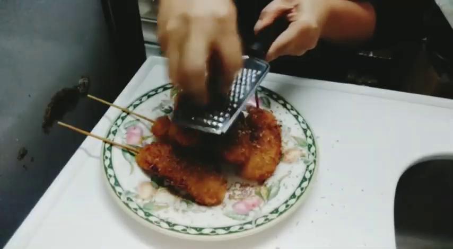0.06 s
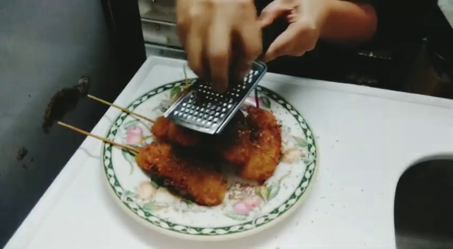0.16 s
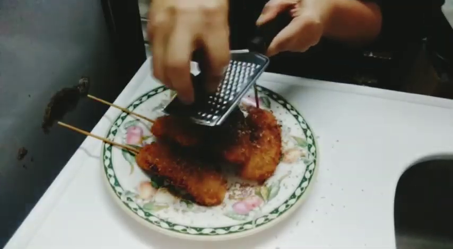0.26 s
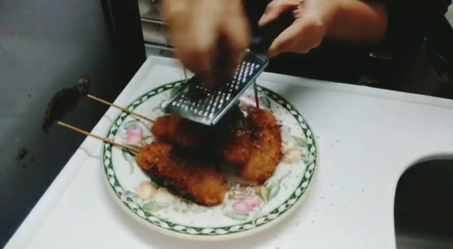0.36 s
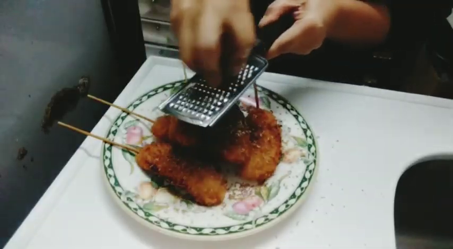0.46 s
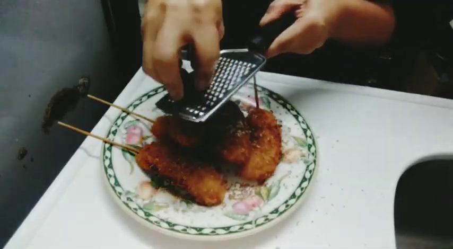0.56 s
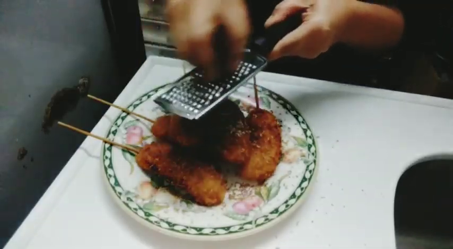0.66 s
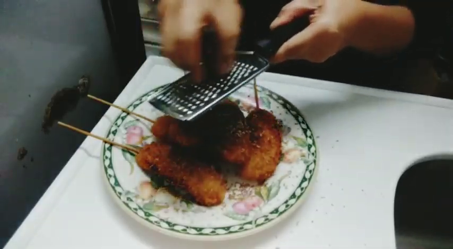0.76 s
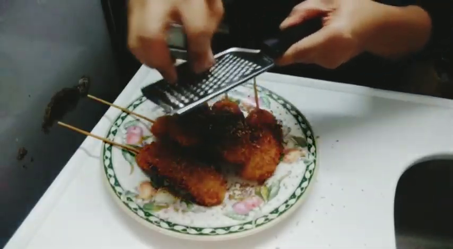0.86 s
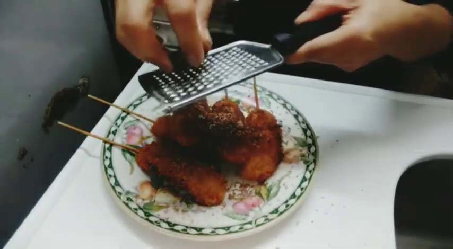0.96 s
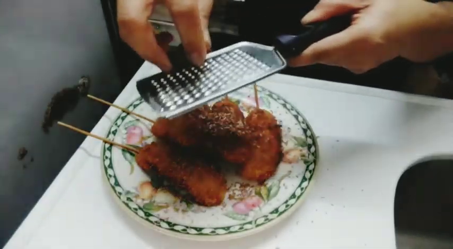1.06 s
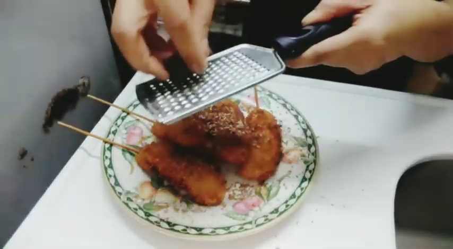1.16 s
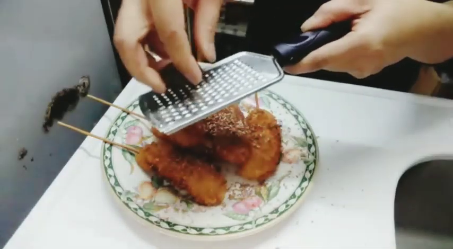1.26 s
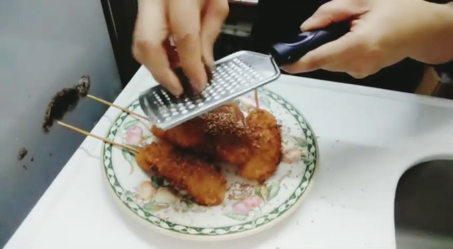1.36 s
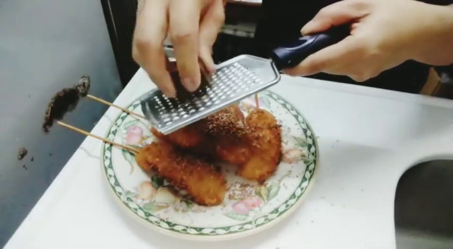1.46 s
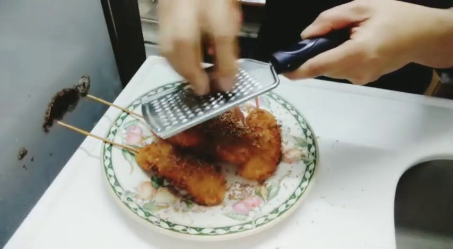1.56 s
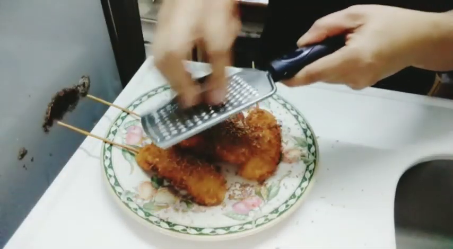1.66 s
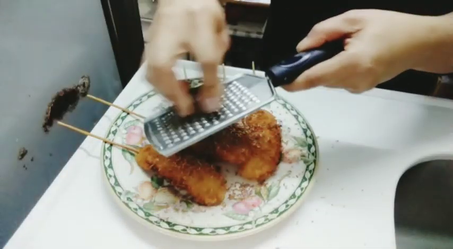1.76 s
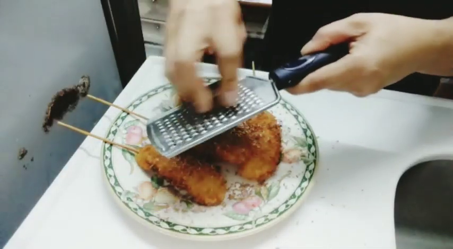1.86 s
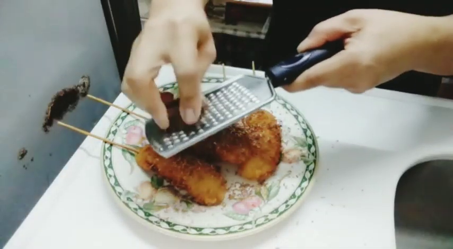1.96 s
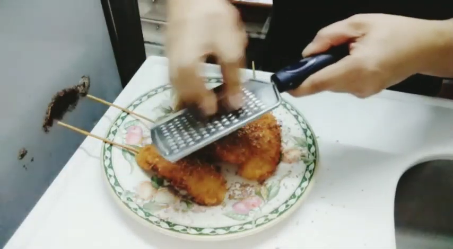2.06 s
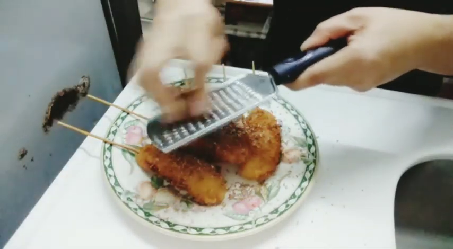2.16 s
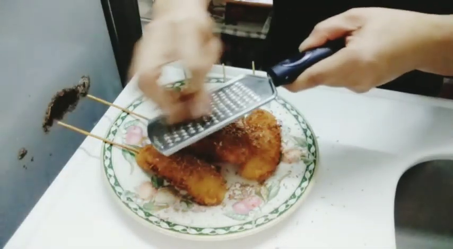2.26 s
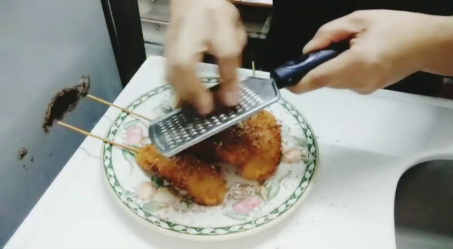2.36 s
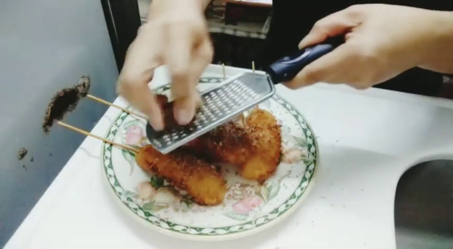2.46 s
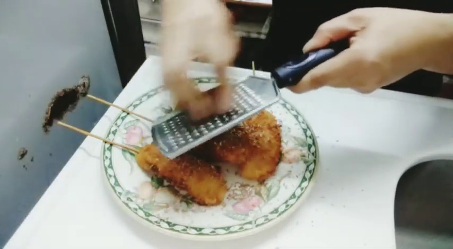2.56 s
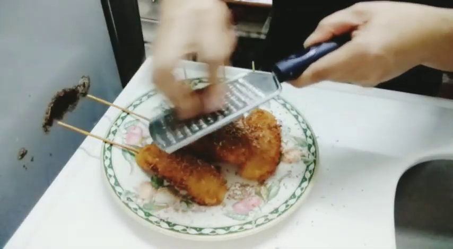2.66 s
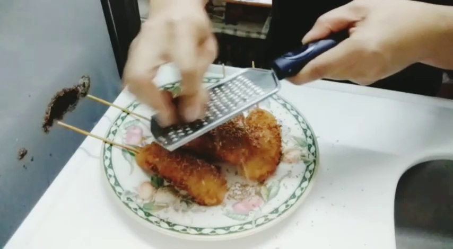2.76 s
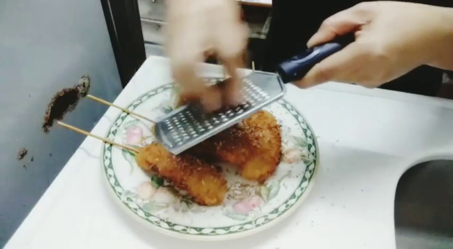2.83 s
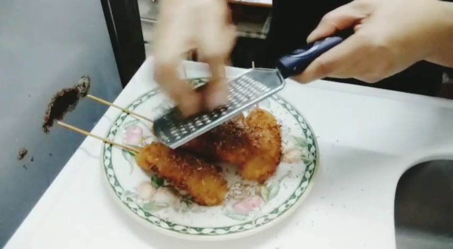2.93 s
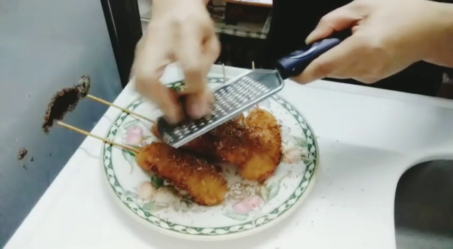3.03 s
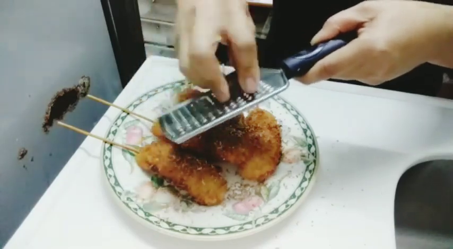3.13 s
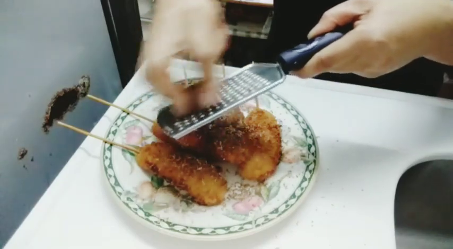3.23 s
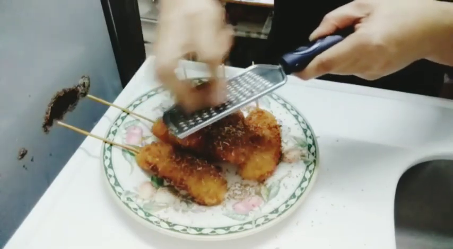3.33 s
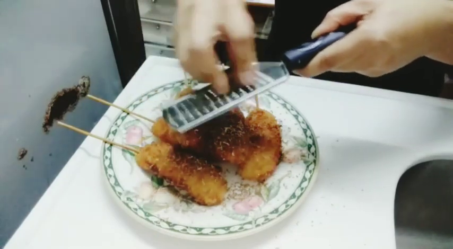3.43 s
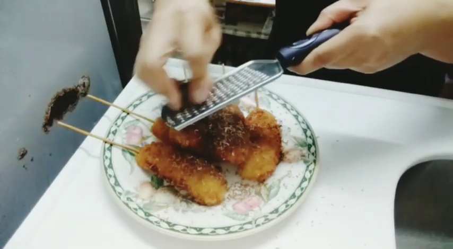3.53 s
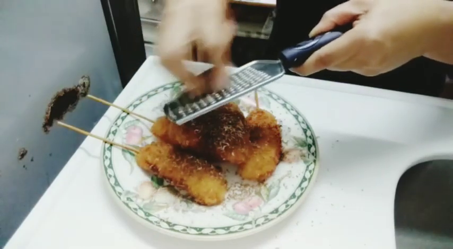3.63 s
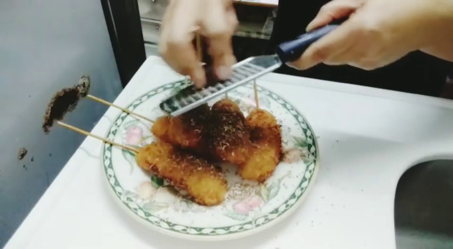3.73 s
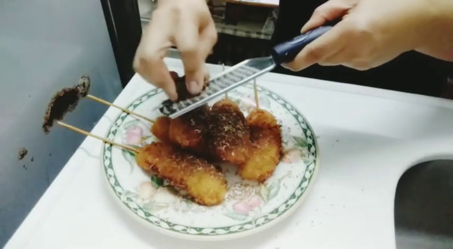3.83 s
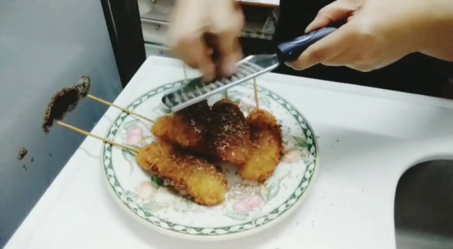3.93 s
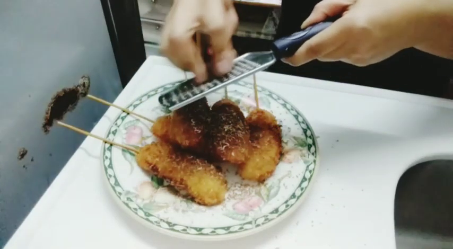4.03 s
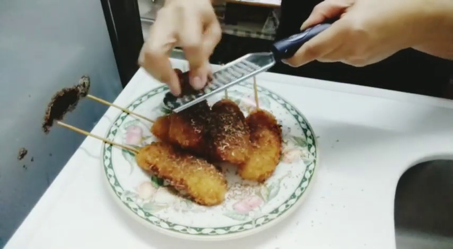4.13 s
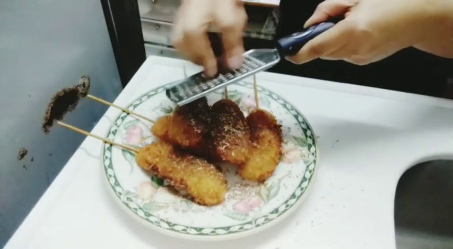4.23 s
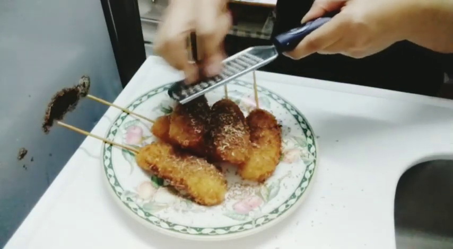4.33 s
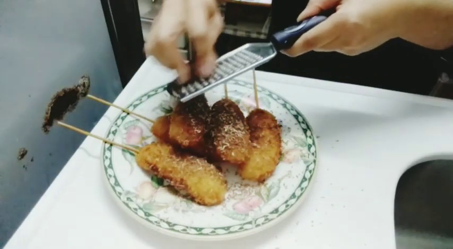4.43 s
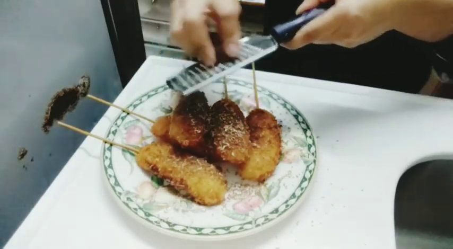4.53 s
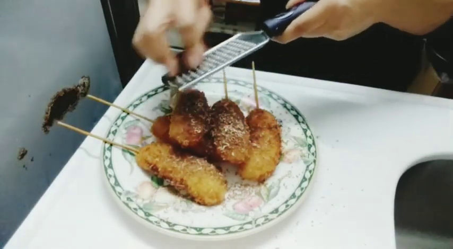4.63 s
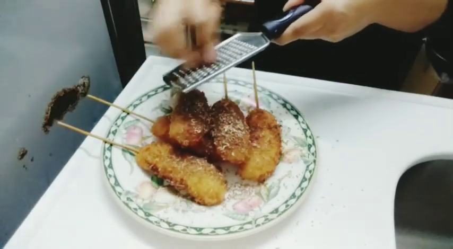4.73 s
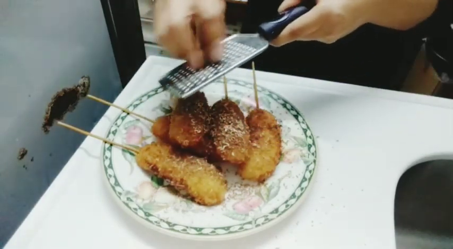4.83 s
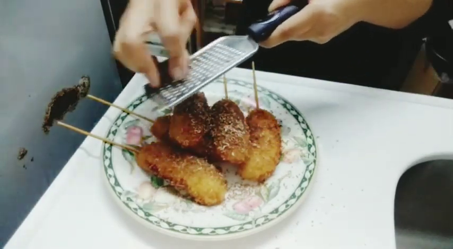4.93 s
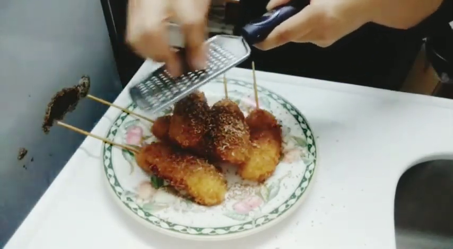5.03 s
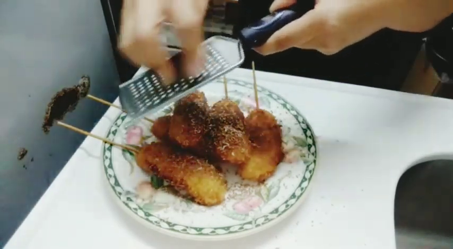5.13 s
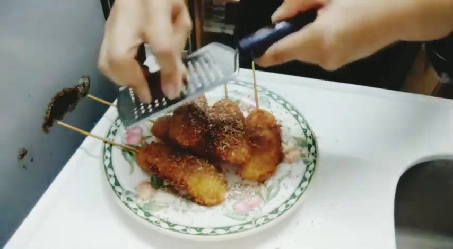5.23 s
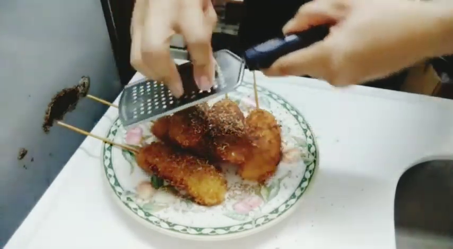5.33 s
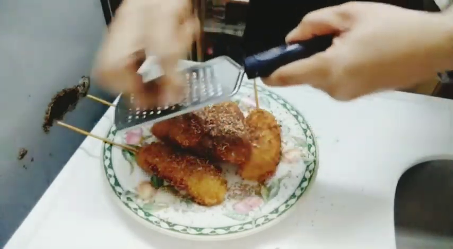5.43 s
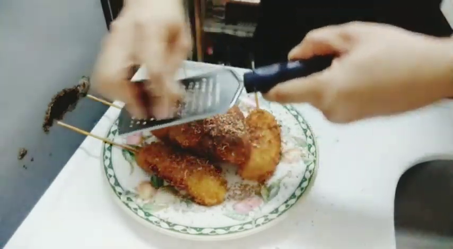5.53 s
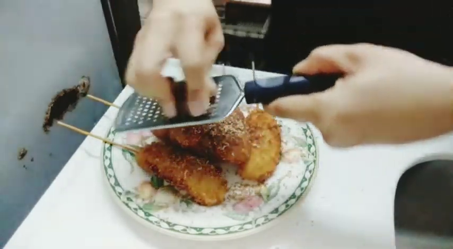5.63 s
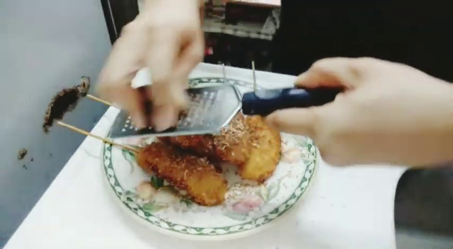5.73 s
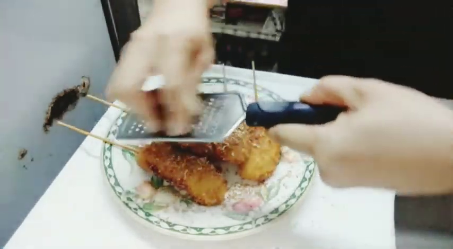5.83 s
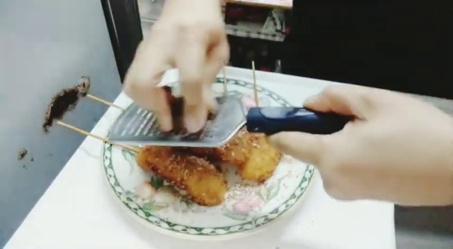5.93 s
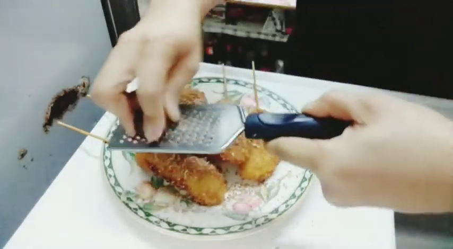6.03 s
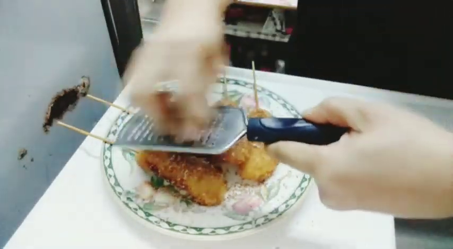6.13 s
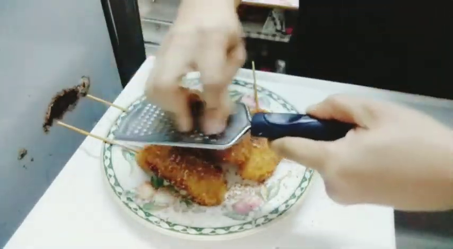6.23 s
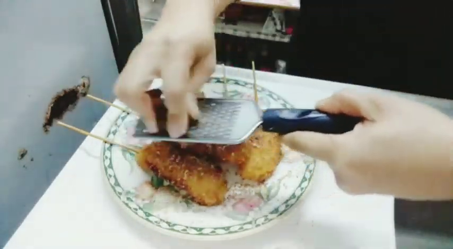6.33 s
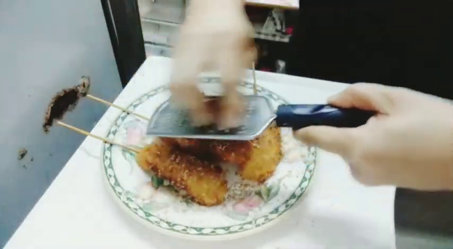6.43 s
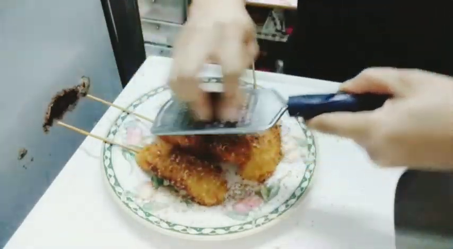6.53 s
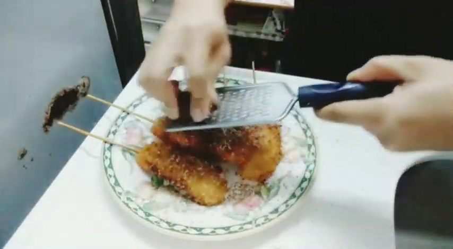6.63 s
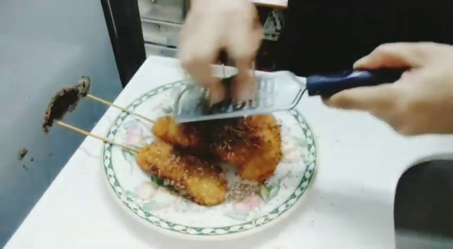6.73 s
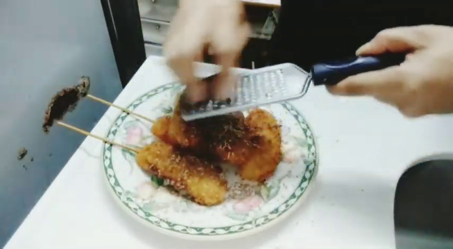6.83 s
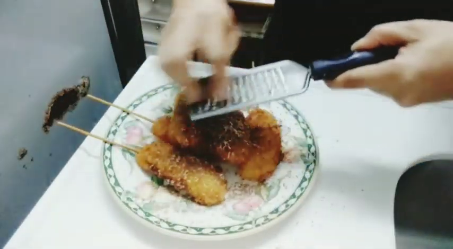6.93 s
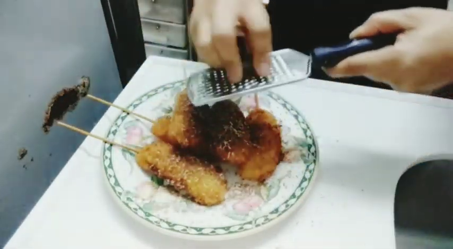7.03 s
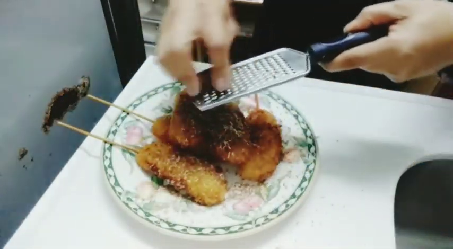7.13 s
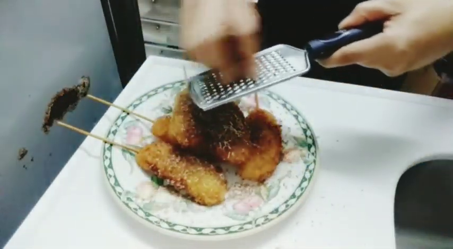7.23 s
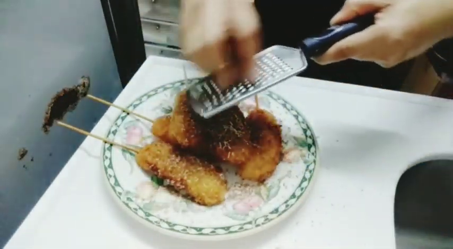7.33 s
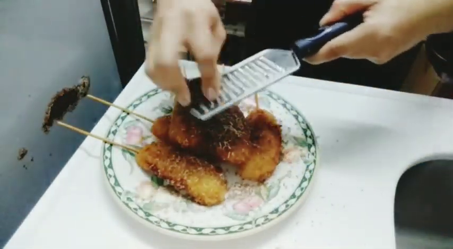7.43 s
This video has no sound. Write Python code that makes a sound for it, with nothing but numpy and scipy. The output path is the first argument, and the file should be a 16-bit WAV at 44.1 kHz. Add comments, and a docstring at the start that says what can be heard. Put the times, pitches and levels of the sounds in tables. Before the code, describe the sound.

In a small kitchen with short hard reflections, heard close up through a phone microphone, a hard bar is rubbed on a thin steel grater over a low droning rumble. From 0 to about 0.8 s, quick strokes rasp and hiss, with a high metallic ring. A pause follows: faint narrow squeaks near 1.0 s, a sharp tap at 1.2 s that lets the sheet ring freely, another tiny squeak near 1.5 s. Rubbing resumes at about 1.55 s, soft at first, then regular, about seven strokes per second, pushes mostly louder than returns. Dull low thuds come at 1.2, 1.6, 2.0 (strongest) and 2.7 s. Teeth snag with little cracks, notably around 2.1 to 2.6 and 3.4 to 3.5 s. Strokes are brightest and strongest from about 5.4 to 6.6 s, and grating continues right to the end at 7.5 s.

```python
"""Small kitchen, phone microphone close by: a hand rubs a hard bar to and fro over a thin steel grater.
From the start, over a low droning rumble, teeth break off crumbs in dense random clicks that hiss, rasp
and ring the plate's damped modes; pushes are mostly louder than returns, and some teeth snag.
In a pause faint squeaks (narrow noise bands) swell, and the plate is tapped and rings freely;
dull thuds of low noise come and go from then on as the rubbing resumes and lasts to the end."""
import sys
import numpy as np
from scipy import signal
from scipy.fft import rfft, irfft
from scipy.io import wavfile
from scipy.ndimage import uniform_filter1d

SR = 44100
rng = np.random.default_rng(int(sys.argv[2]) if len(sys.argv) > 2 else 0)


def inscribe(sig):
    """Save sig as 16-bit PCM at rate SR to the path in sys.argv[1].

    A 1-D sig is mono; a 2-D sig holds one channel per row.
    Samples are clipped to [-1, 1] before scaling.
    """
    pcm = np.round(np.clip(np.atleast_2d(sig).T, -1, 1) * 32767)
    wavfile.write(sys.argv[1], SR, pcm.astype(np.int16))


N = 329868
T = np.arange(N) / SR  # seconds


def undb(db):
    """Decibels to gain."""
    return 10 ** (np.asarray(db) / 20)


def unit(x):
    """Scale to rms 1."""
    return x / np.sqrt(np.mean(x ** 2))


def colour(x, shape, size=4096):
    """Causal minimum-phase filter from (Hz, dB) points, by the cepstrum of the log gain."""
    hz, db = np.transpose(shape)
    f = np.maximum(np.arange(size // 2 + 1) * SR / size, 1)
    log_gain = np.interp(np.log(f), np.log(hz), db) * np.log(10) / 20
    cepstrum = irfft(log_gain)
    # fold the cepstrum onto positive time so that the filter is causal
    cepstrum[1:size // 2] *= 2
    cepstrum[size // 2 + 1:] = 0
    impulse = irfft(np.exp(rfft(cepstrum)))
    return signal.fftconvolve(x, impulse)[:N]


def mode(x, hz, t60):
    """One damped vibration, impulse peak near 1, falling 60 dB in t60 seconds."""
    radius = np.exp(-np.log(1000) / (t60 * SR))
    angle = 2 * np.pi * hz / SR
    return signal.lfilter([0, np.sin(angle)], [1, -2 * radius * np.cos(angle), radius * radius], x)


def walk(rate):
    """Random levels held 1 / rate seconds and smoothed twice; rms 1."""
    hold = int(SR / rate)
    steps = rng.standard_normal(N // 20)[np.arange(N) // hold]
    return unit(uniform_filter1d(uniform_filter1d(steps, hold), hold))


def burst(s, db, t60, held=0.):
    """Envelope that jumps up at s, holds, then dies away."""
    fading = np.clip(T - s - held, 0, 2)
    return np.where(T >= s, undb(db - 60 * fading / t60), 0)


def hum(hz, width):
    """Noise in one resonance, rms 1; a narrower band rings longer."""
    return unit(mode(rng.standard_normal(N), hz, np.log(1000) / (np.pi * width)))


# Low noise of the place. Each row: frequency in Hz, relative density in dB per Hz.
RUMBLE_COLOUR = [(25, -38), (50, -31), (100, 0.5), (200, -10), (400, -13.5), (720, -13.5), (850, -25),
                 (1600, -32.5), (2060, -36), (2750, -31.5), (9200, -44), (14800, -38), (16000, -30)]
# Droning resonances in the rumble. Each row: frequency in Hz, width in Hz, mean level in dB.
DRONES = [(95.7, 9, -57.5), (116, 39, -59), (170.6, 6.1, -61.5), (258.3, 15.5, -55)]
# Slow swell of the drones. Each row: time in seconds, level in dB, of which only the changes count.
DRONE_SWELL = [(0.0, -47.5), (1.45, -55.5), (2.05, -50), (3.2, -53.5), (3.6, -47.5), (6.4, -53),
               (7.48, -51)]
RUMBLE_DB = -52


def rumble():
    """Steady low coloured noise, and a few narrow resonances of noise that swell slowly."""
    steady = unit(colour(rng.standard_normal(N), RUMBLE_COLOUR, size=16384)) * undb(RUMBLE_DB)
    s, swell_db = np.transpose(DRONE_SWELL)
    swell = undb(np.interp(T, s, swell_db - swell_db.mean()))
    drones = sum(undb(db) * hum(hz, width) for hz, width, db in DRONES)
    return steady + drones * swell


# Rubs of the bar, push and return in turn.
# Each row: start (teeth bite) in seconds, length in ms, hiss level in dB before mixing.
STROKES = [(-.028, 74, -51), (.069, 65, -33.5), (.187, 77.6, -26), (.330, 71, -33.5), (.460, 92, -27.5),
           (.607, 77, -33.5), (.729, 102, -33.5), (1.545, 60, -48.5), (1.638, 68.4, -35.5),
           (1.758, 66, -36.5), (1.869, 74.7, -26.5), (2.005, 70, -32.5), (2.112, 82.5, -28.5),
           (2.255, 65, -31), (2.377, 84, -25), (2.519, 68, -33), (2.633, 80, -27), (2.768, 71, -30.5),
           (2.889, 85, -27), (3.037, 81, -32.5), (3.168, 80, -25), (3.315, 67, -31.5), (3.444, 84.5, -27),
           (3.590, 75, -35), (3.727, 78, -30), (3.873, 75, -35), (4.023, 77, -26.5), (4.156, 72, -32),
           (4.279, 82.4, -26), (4.417, 77, -33), (4.544, 84, -25.5), (4.692, 70, -31.5),
           (4.815, 78.5, -26.5), (4.960, 93, -34.5), (5.110, 72, -30.5), (5.238, 92, -38.5),
           (5.378, 76, -21), (5.516, 79.5, -29.5), (5.667, 71.5, -23), (5.806, 64, -31.5), (5.939, 82, -24),
           (6.090, 77, -29.5), (6.227, 78, -19.5), (6.373, 67, -33), (6.502, 91.4, -20.5), (6.656, 75, -37),
           (6.780, 81, -24), (6.915, 82, -32), (7.043, 79, -24), (7.169, 84, -30), (7.294, 92, -24)]
# How the plate is held and where the bar rubs. Each row: time in seconds, favoured mode in Hz,
# ring of a usual push in dB before mixing, its low rasp in dB before mixing.
GRIP = [(0, 4070, -23.5, -43.5), (.9, 3570, -37, -46), (1.7, 2960, -27, -42.5), (2.4, 2960, -22, -40.5),
        (3.85, 3020, -26, -37.5), (4.0, 3560, -26.5, -39.5), (4.65, 3700, -28, -38.5),
        (4.85, 4540, -28.5, -42), (6.0, 5470, -25.5, -40), (6.27, 4130, -38, -41),
        (6.5, 2930, -27.5, -41.5), (7.48, 2700, -26, -41.5)]
PUSH_SPEEDUP, RETURN_SPEEDUP = 0.65, 0.53  # share of the stroke spent speeding up
RETURN_RASP_DB, RETURN_RING_DB = -8.5, -9.5  # returns slide over the backs of the teeth
USUAL_DB, RASP_FOLLOWS, RING_FOLLOWS = -27.5, 0.15, 0.77  # dB gained per dB of stroke above the usual


def strokes(ramp_db=5.5, bite=6, shape=2.23):
    """Force envelopes for hiss, rasp and ring: teeth bite suddenly, the stroke builds, then slows down."""
    hiss, rasp, ring = np.zeros((3, N))
    grip_s, _, grip_ring_db, grip_rasp_db = np.transpose(GRIP)
    for k, (start, length, db) in enumerate(STROKES):
        back = k % 2  # 1 on a return
        speedup = RETURN_SPEEDUP if back else PUSH_SPEEDUP
        rise, fall = speedup * length, (1 - speedup) * length  # ms
        s = start + rise / 1000  # moment of most force
        near = slice(max(int((s - .15) * SR), 0), int((s + .15) * SR))
        t = (T[near] - s) * 1000  # ms
        early, late = np.maximum(-t / rise, 0), np.maximum(t / fall, 0)
        gain = undb(-ramp_db * early - (8.5 - ramp_db) * early ** bite - 10 * late ** shape)
        above_db = db - USUAL_DB
        rasp_db = np.interp(s, grip_s, grip_rasp_db) + back * RETURN_RASP_DB + RASP_FOLLOWS * above_db
        ring_db = np.interp(s, grip_s, grip_ring_db) + back * RETURN_RING_DB + RING_FOLLOWS * above_db
        hiss[near] += gain * undb(db)
        rasp[near] += gain * undb(rasp_db)
        ring[near] += gain * undb(ring_db)
    return hiss, rasp, ring


# A tooth catches and lets go. Each row: time in seconds, crack in dB and low knock in dB, before mixing.
SNAGS = [(0.002, -58, -36.5), (0.327, -35.5, -68), (0.601, -29.5, -67), (0.758, -29, -47),
         (0.783, -31.9, -65), (1.677, -36, -51), (2.129, -27, -44), (2.159, -28, -39), (2.3, -39, -33.5),
         (2.43, -25, -58), (2.554, -48, -32.5), (3.222, -33, -52), (3.43, -26, -64), (3.463, -27, -53),
         (3.478, -21.5, -54), (3.495, -43, -48), (3.511, -23.5, -41), (3.778, -30, -59), (4.028, -38, -57),
         (4.446, -34.2, -47), (5.277, -45, -33), (6.227, -34, -60), (6.38, -44, -66), (6.409, -42, -42)]
SNAG_T60_S, KNOCK_T60_S = .035, 0.071


def pressure():
    """Stroke forces that judder as rows of teeth grip unevenly, plus the sudden release of each snag."""
    judder = undb(0.4 * walk(35) + 1.26 * walk(70) + 1.43 * walk(250))
    hiss, rasp, ring = (force * judder for force in strokes())
    for s, crack_db, knock_db in SNAGS:
        crack = uniform_filter1d(burst(s, crack_db, SNAG_T60_S), size=200)
        hiss = hiss + 1.02 * crack
        ring = ring + 0.9 * crack
        rasp = rasp + burst(s, knock_db, KNOCK_T60_S)
    return hiss, rasp, ring


def clicks(share, spread_db):
    """Breaking crumbs: a share of the samples carry a click, a few much larger than the rest."""
    hit = rng.random(N) < share
    return unit(hit * rng.standard_normal(N) * undb(spread_db * rng.exponential(size=N)))


# Modes of the steel plate. Each row: frequency in Hz, relative level in dB, longest t60 in seconds.
PLATE_MODES = [(2300, -11, .12), (2790, -7, .2), (2880, -8, .08), (3300, -5, .08), (3540, -1, .11),
               (3790, -2, .08), (4000, -7, .09), (4460, -3, .1), (4870, -6, .09), (5140, -4, .09),
               (5850, -7, .08), (6310, -9, .11), (7250, -8, .07), (8530, -9, .07), (11900, -10, .04)]
REACH = .25  # spread of favoured modes in log pitch


def plate(force, longest_t60, favoured_hz=None, drop_db=14):
    """The plate rings no longer than its damping allows; modes far from the favoured pitch are fed less."""
    ringing = 0
    for hz, db, t60 in PLATE_MODES:
        feed = 1
        if favoured_hz is not None:
            distance = np.log(hz / favoured_hz) / REACH
            feed = undb(-drop_db * np.tanh(distance ** 2))
        ringing = ringing + undb(db) * mode(force * feed, hz, min(t60, longest_t60))
    return ringing


def shimmer(force, t60, wander_db, count=64):
    """The crowd of short high modes of the punched sheet, each fed by a randomly wandering share."""
    centres = np.linspace(2400, 15600, count) + 25 * rng.standard_normal(count)
    return sum(mode(force * undb(wander_db * walk(18)), hz, t60) for hz in centres)


def radiate(x, edge_hz=2300):
    """A small thin sheet hardly radiates its low motion."""
    return signal.sosfilt(signal.butter(4, edge_hz, "high", fs=SR, output="sos"), x)


# Bright hiss of breaking crumbs. Each row: frequency in Hz, relative density in dB per Hz.
CRUMB_COLOUR = [(900, -49.5), (1500, -10), (1950, -8), (2700, -3), (4200, -4), (6640, -1.5), (8500, -1),
                (9370, -4), (11800, 1), (14500, -0.5), (15800, 2)]
# Low rasp of the bar. Each row: frequency in Hz, relative density in dB per Hz.
RASP_COLOUR = [(400, -5.5), (650, 0), (950, -1), (1250, 0), (1650, -2.5), (2300, -7.5)]
BAR_T60_S, FREE_END_T60_S = .012, .1  # the pressing bar stops the ring; the free end rings on


def grating():
    """Clicks through the crumb colour and the sheet, a low rasp of the bar, and the damped plate."""
    hiss, rasp, ring = pressure()
    # the bar never leaves the steel: a light drag bridges the turns
    hiss = hiss + undb(-20) * uniform_filter1d(hiss, size=7000)
    bright = hiss * unit(colour(clicks(.5, 1.), CRUMB_COLOUR))
    low = undb(-1.0) * rasp * unit(colour(clicks(0.56, 0.52), RASP_COLOUR))
    # at the turns the bar still scuffs unevenly
    rasp_drag = undb(-16) * uniform_filter1d(rasp, size=7000) * undb(4 * walk(12))
    low = low + rasp_drag * unit(colour(clicks(.5, 0.69), RASP_COLOUR))
    sheet = shimmer(bright, .016, 3.3)
    # coarse bites come in clumps and speak through the plate
    bites = ring * undb(3 * walk(70)) * clicks(.2, 1.)
    grip_s, favoured_hz = np.transpose(GRIP)[:2]
    ringing = plate(bites, BAR_T60_S, np.interp(T, grip_s, favoured_hz))
    ringing = ringing + undb(-27) * plate(bites, FREE_END_T60_S)
    return undb(-8.5) * bright + low + radiate(undb(-39.0) * sheet + undb(-24.5) * ringing)


# Faint squeaks. Each row: start in seconds, length in seconds, centre in Hz, width in Hz, level in dB.
SQUEAKS = [(.975, .1, 2410, 110, -59), (.985, .1, 2850, 700, -62), (1.468, .11, 2900, 400, -57)]


def squeaks():
    """Narrow bands of noise that swell and fade."""
    out = 0
    for s, length, hz, width, db in SQUEAKS:
        swell = uniform_filter1d(burst(s, db, 2 * length, .6 * length), 500)
        edges = signal.butter(2, [hz - width / 2, hz + width / 2], "band", fs=SR, output="sos")
        out = out + swell * unit(signal.sosfilt(edges, rng.standard_normal(N)))
    return out


# Taps on the plate. Each row: time in seconds, strength in dB before mixing.
TAPS = [(1.17, -29.5), (1.36, -61), (1.548, -47)]
# Crack of a tap. Each row: frequency in Hz, relative density in dB per Hz.
TAP_COLOUR = [(500, -6), (1900, -11), (2600, -4), (5000, -6), (8500, -12), (10000, -16), (15800, -17)]


def taps():
    """A fingertip blow: one sharp push rings the free plate, under a crack of noise that rattles out."""
    force = np.zeros(N)
    for s, db in TAPS:
        force[int(s * SR)] = undb(db)
    envelope = sum(burst(s, db, 0.21) for s, db in TAPS)
    crack = envelope * unit(colour(rng.standard_normal(N), TAP_COLOUR))
    return radiate(undb(-8) * plate(force, 1)) + undb(-15) * crack


# Dull thuds through floor and walls. Each row: start in seconds, level in dB, hold in seconds,
# t60 in seconds.
THUDS = [(1.19, -44.5, 0.028, 0.26), (1.605, -37.5, 0.057, 0.43), (1.96, -28.5, 0.047, 0.32),
         (2.07, -51, 0.05, 0.62), (2.722, -43.5, 0.06, 0.25)]
# Their colour. Each row: frequency in Hz, relative density in dB per Hz.
THUD_COLOUR = [(29, -98), (50, -48), (102, -4.5), (167, -4), (249, -17.5), (289, -14), (432, -25.5),
               (653, -23), (1000, -64), (1300, -87), (2200, -120)]


def thuds():
    """Low noise that jumps up, holds briefly and dies away, as heard through floor and walls."""
    envelope = sum(uniform_filter1d(burst(s, db, t60, held), 300) for s, db, held, t60 in THUDS)
    return envelope * unit(colour(rng.standard_normal(N), THUD_COLOUR, size=16384))


ROOM_T60_S, ROOM_DB, ROOM_HZ = 0.22, -7.5, 5150  # decay, level and treble edge of the reflections


def room(near):
    """A short hard-walled room: a decaying noise tail after 4 ms, duller than the direct sound."""
    t = T[:SR // 2]
    tail = rng.standard_normal(len(t)) * undb(-60 * t / ROOM_T60_S) * (t > .004)
    tail = unit(tail) / np.sqrt(len(t))  # unit energy
    return signal.lfilter(*signal.butter(1, ROOM_HZ, fs=SR), signal.fftconvolve(near, tail)[:N])


def scene():
    """The near grater sounds with their room, and the squeaks, rumble and thuds without it."""
    near = grating() + taps()
    return (near + undb(ROOM_DB) * room(near) + squeaks() + rumble() + thuds())[None]


TOP_HZ = 15720  # upper edge of the phone's band


def record(dry):
    """The phone drops the deepest bass and cuts the top steeply."""
    dry = signal.sosfilt(signal.butter(3, 58, "high", fs=SR, output="sos"), dry)
    return signal.sosfilt(signal.ellip(12, .2, 70, TOP_HZ, fs=SR, output="sos"), dry)


dry = scene()
out = record(dry)
inscribe(out)
```